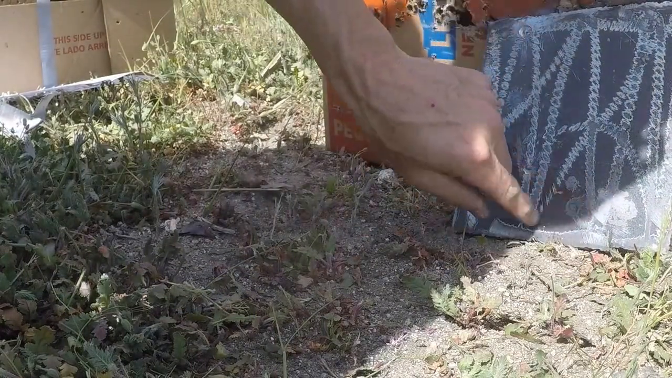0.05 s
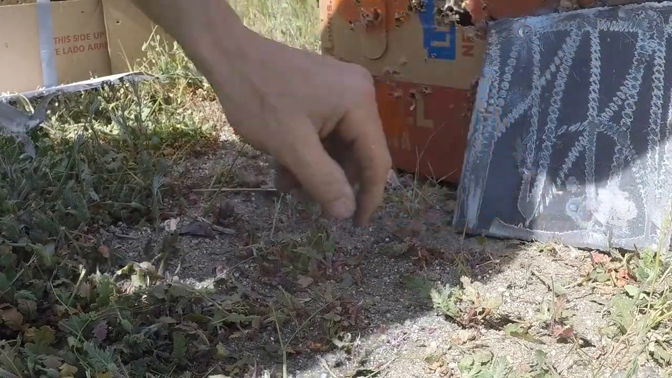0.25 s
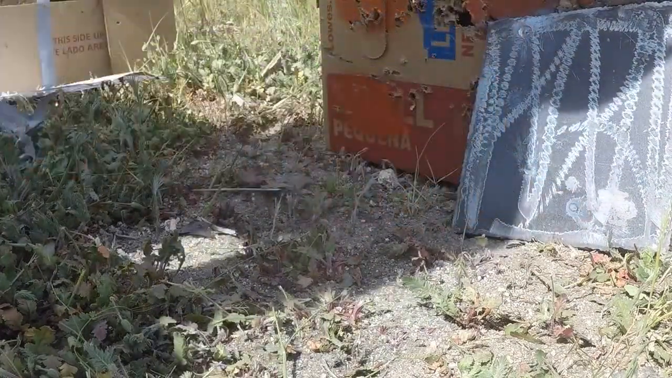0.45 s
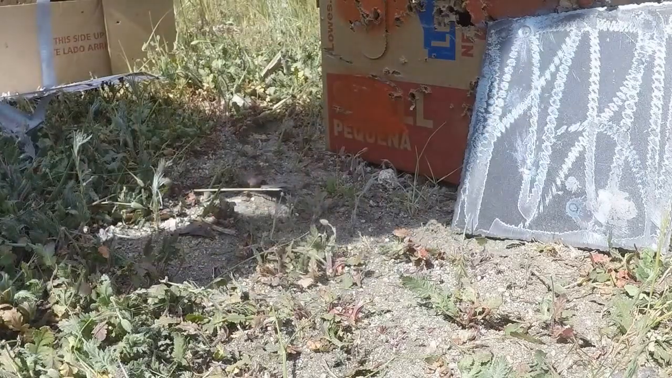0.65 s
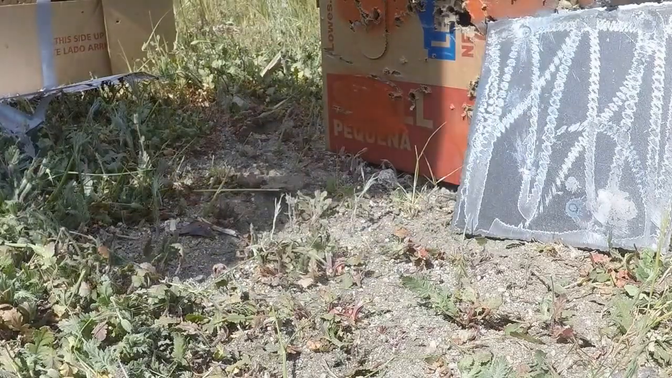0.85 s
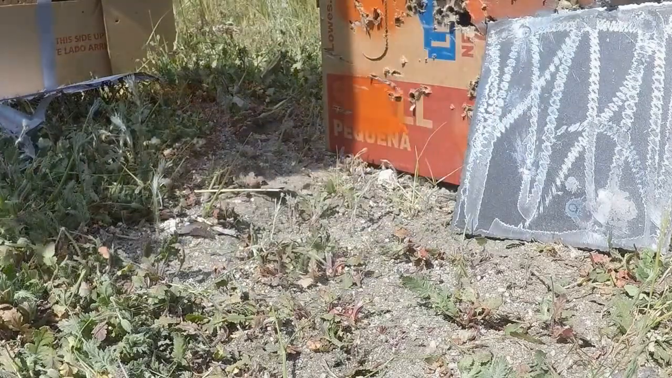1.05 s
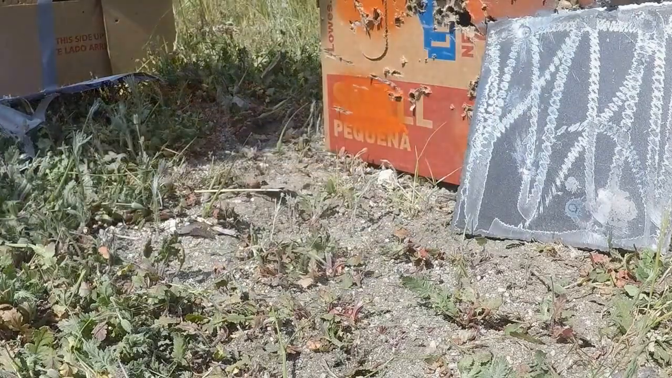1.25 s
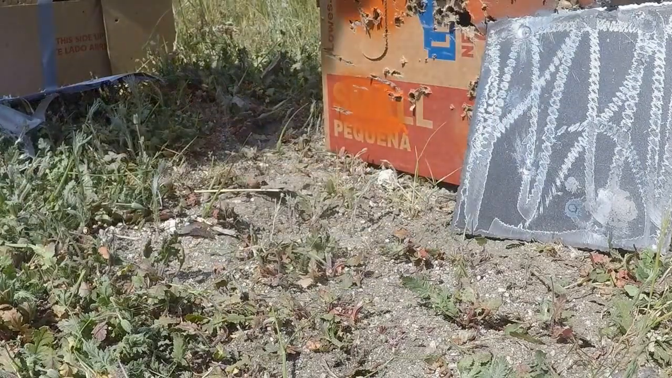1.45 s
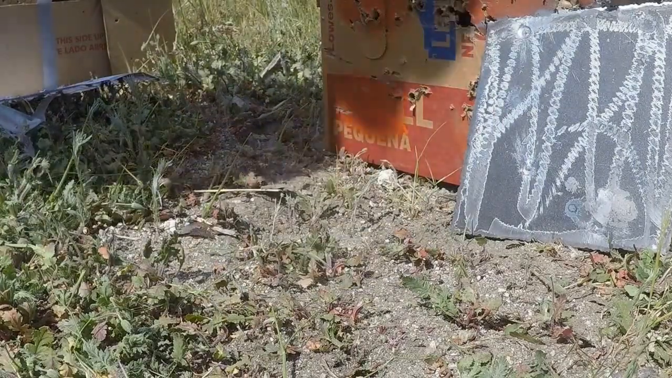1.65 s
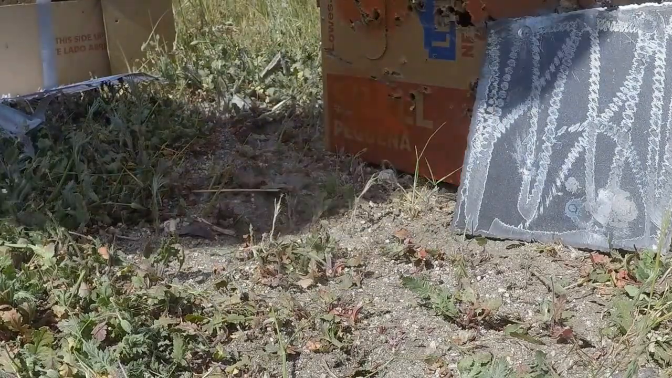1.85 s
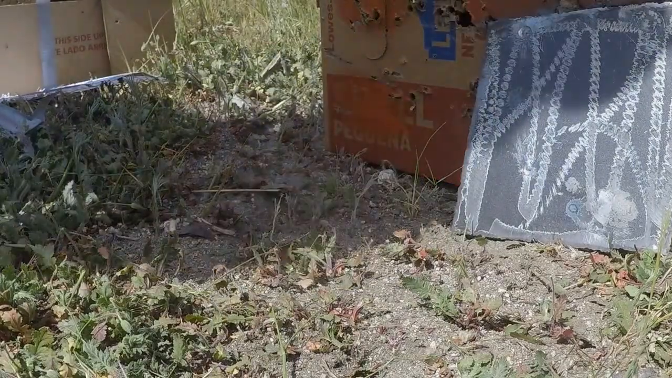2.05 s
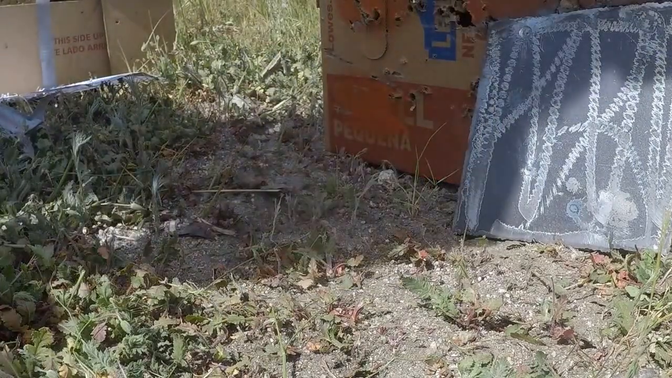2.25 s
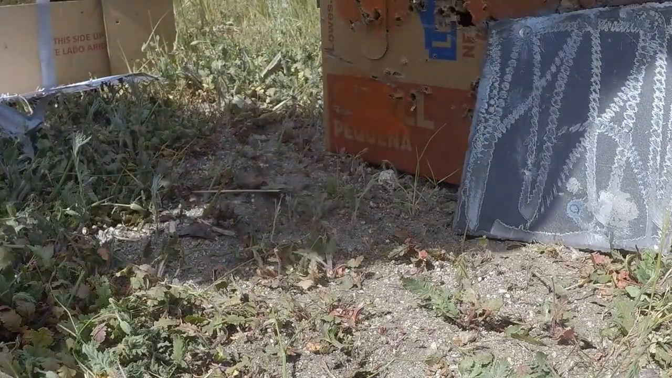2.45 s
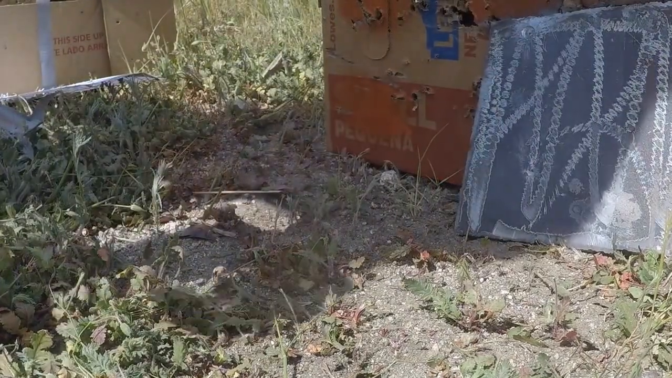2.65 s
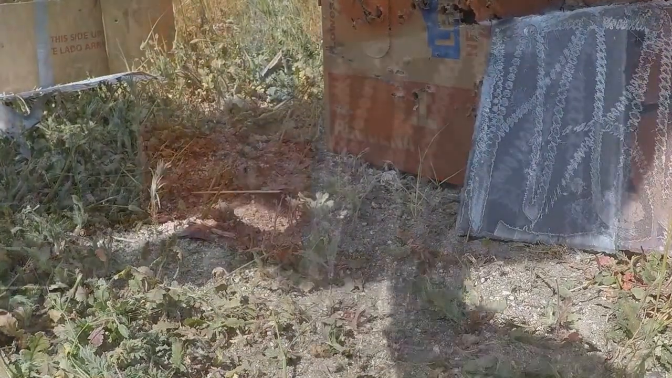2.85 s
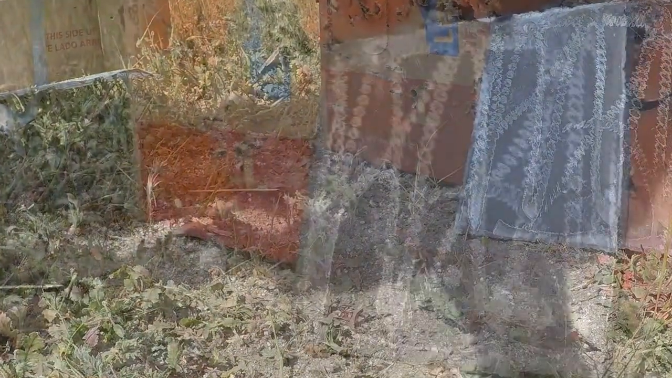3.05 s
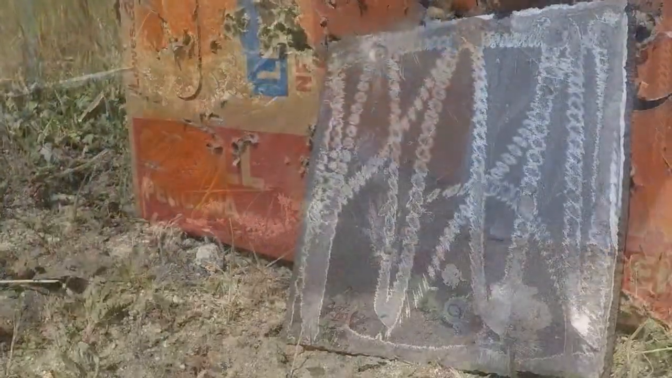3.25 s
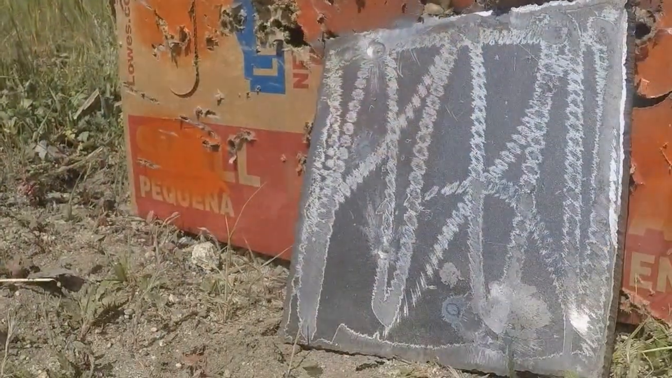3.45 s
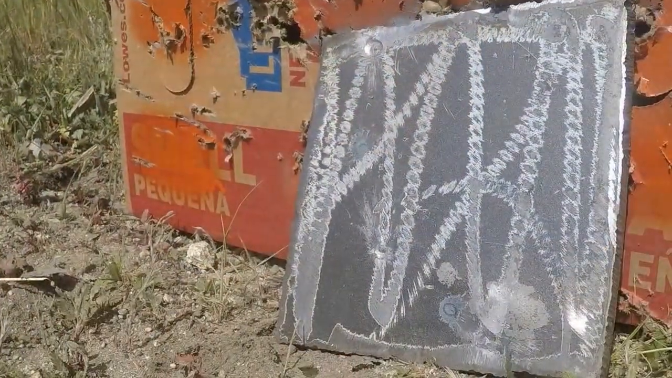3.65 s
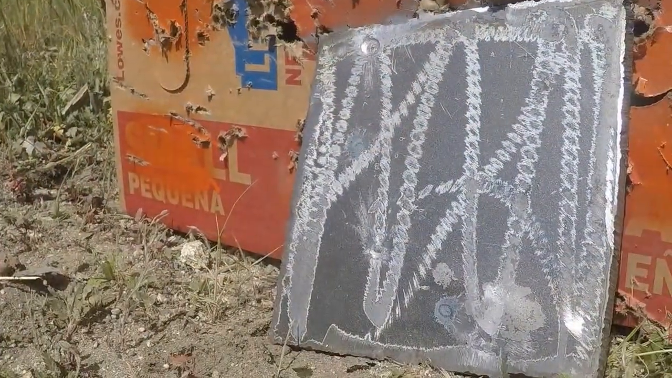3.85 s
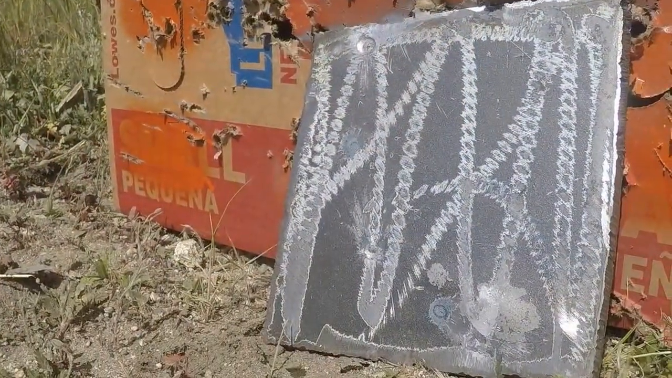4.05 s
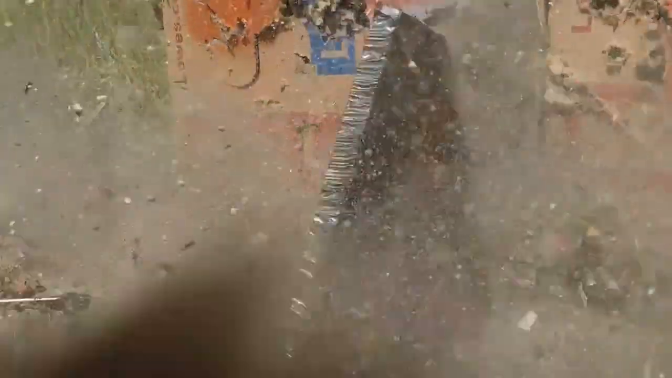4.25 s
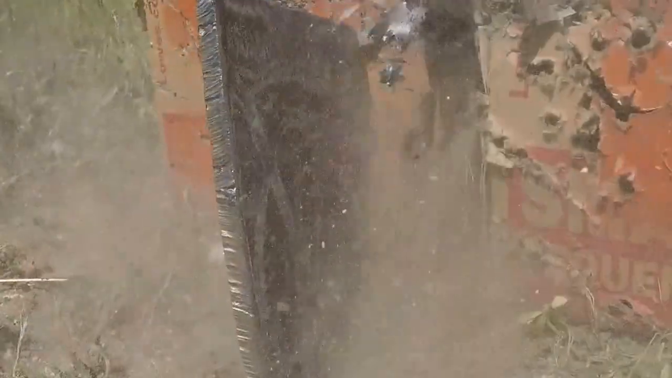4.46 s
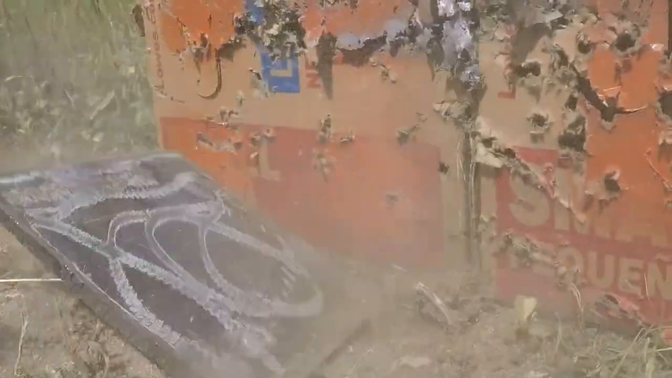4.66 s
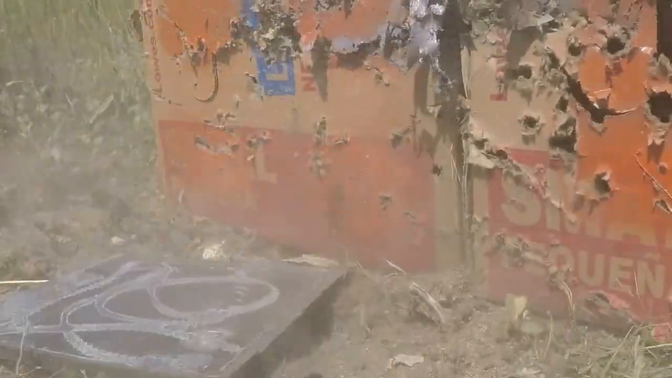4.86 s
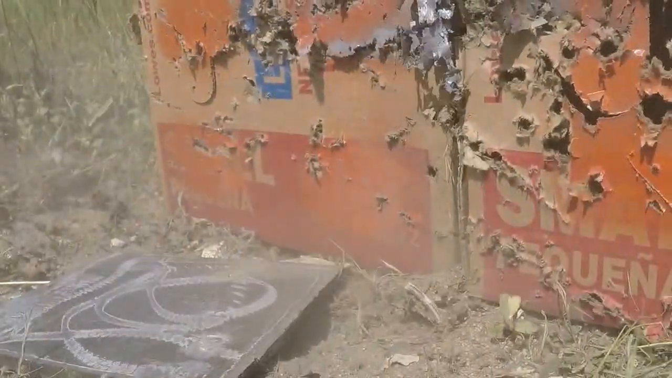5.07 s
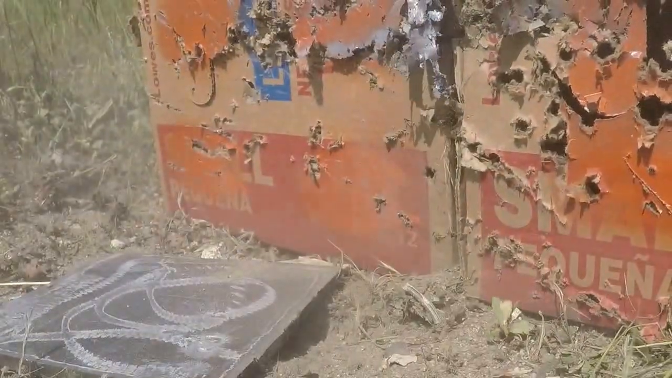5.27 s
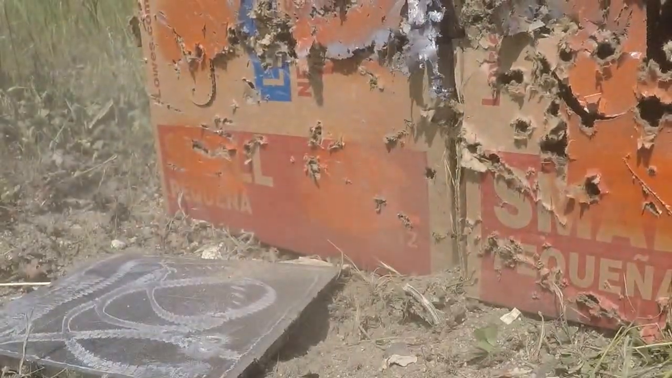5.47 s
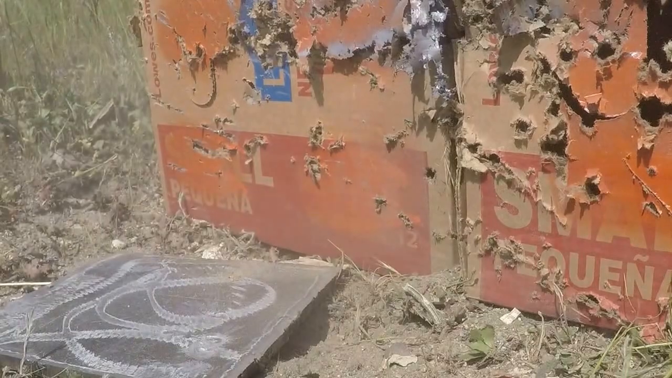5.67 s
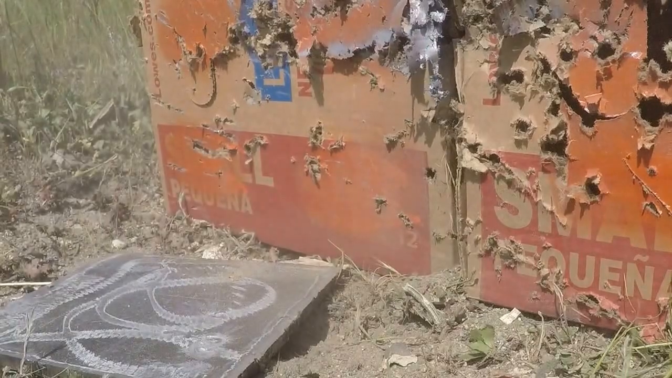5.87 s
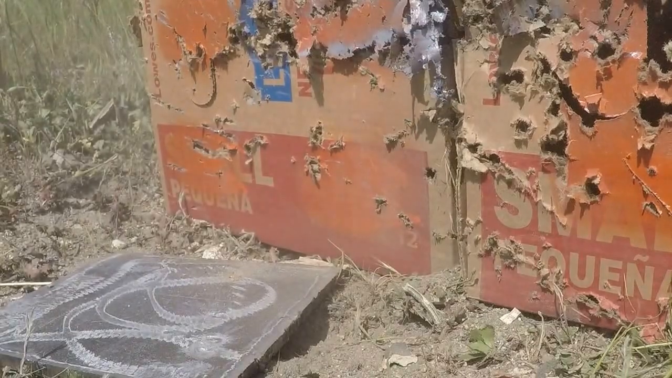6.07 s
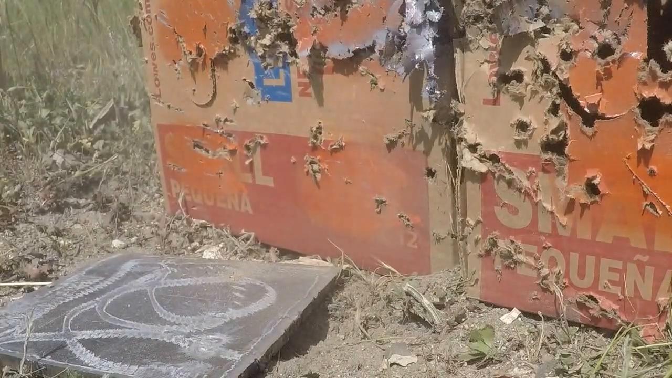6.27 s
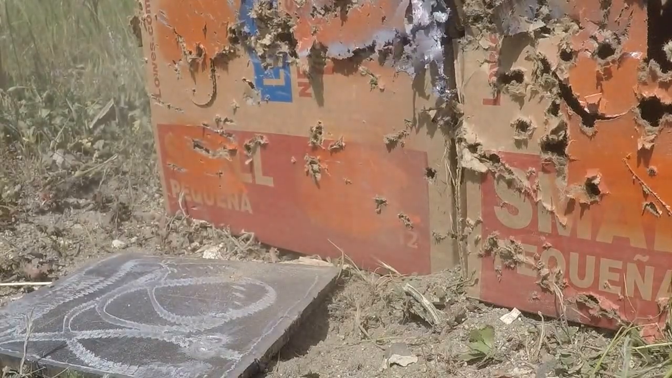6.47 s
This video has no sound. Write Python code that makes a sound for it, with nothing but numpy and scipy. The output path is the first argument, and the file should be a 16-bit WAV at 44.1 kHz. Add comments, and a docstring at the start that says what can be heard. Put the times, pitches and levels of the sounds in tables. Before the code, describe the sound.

Faint steps and soft ticking in open air, a thud and clack, then an overloaded bullet strike on steel, brief ring and pattering debris.

```python
"""A shot slams a steel plate leaning on a cardboard box: decaying modes clank, then ring as it spins and flops down.
Earth, stones and pebbles fly as grain clicks; the blow and its blast of air are damped swings of sagging pitch.
Before it feet shuffle and scuff on dry ground (dense grains), weight thuds, and modes clack over a hollow scrape.
Dry resonant knocks sound further off, in shaped noise for open air and breeze; filtered pulses tick softly.
The camera overloads, turns its gain down, holds it and slowly recovers."""
import sys
import numpy as np
from scipy import signal
from scipy.fft import rfft, irfft
from scipy.io import wavfile
from scipy.ndimage import uniform_filter1d, minimum_filter1d

SR = 44100
rng = np.random.default_rng(int(sys.argv[2]) if len(sys.argv) > 2 else 0)


def master(y):
    """Save y as 16-bit WAV."""
    cut = np.clip(np.atleast_2d(y).T, -1, 1)
    pcm = np.round(cut * 32767)  # scale
    wavfile.write(sys.argv[1], SR, pcm.astype(np.int16))


N = 287443
T = np.arange(N) / SR  # time in the scene, s
AFTER = T[:SR]  # time since a blow, s
STRIKE_S = 4.2288  # the shot meets the plate

# the plate flops down and rocks twice: start_s, level_db (relative to the first contact)
LANDINGS = [(4.801, 0), (4.949, -4.5), (5.085, -13)]


def amp(db):
    """Logarithmic level: decibels to amplitude gain."""
    return 10 ** (np.asarray(db) / 20)


def fade(t60):
    """Exponential decay: the level falls 60 dB in t60 seconds."""
    return amp(-60 * AFTER / max(t60, 1e-3))


def add(out, s, sound):
    """Superposition: mix a sound in at time s."""
    start = int(s * SR)
    out[start:start + len(sound)] += sound[:N - start]


def colour(x, points):
    """Spectral shaping: weight x by a curve of (Hz, dB) points, then scale it to unit spread."""
    hz, db = np.transpose(points)
    f = np.maximum(np.fft.rfftfreq(len(x), 1 / SR), 1)
    gain = amp(np.interp(np.log(f), np.log(hz), db))
    y = irfft(rfft(x) * gain, len(x))
    return y / y.std()


def band_noise(hz, octaves):
    """Band-limited noise: one second under a bell on the octave scale, scaled to unit spread."""
    f = np.geomspace(20, SR / 2, num=64)
    distance = np.log2(f / hz) / octaves
    bell_db = -14 * np.hypot(distance, 1)
    return colour(rng.standard_normal(SR), np.c_[f, bell_db])


def lowpass(x, hz, order=2):
    """Treble loss: a causal Butterworth low-pass."""
    return signal.sosfilt(signal.butter(order, min(hz, .45 * SR), fs=SR, output="sos"), x)


def ring(hz, db, t60):
    """Modal superposition: each mode is a sine with its own exponential decay."""
    return sum(amp(d) * fade(t) * np.sin(2 * np.pi * f * AFTER) for f, d, t in zip(hz, db, t60))


def walk(rate):
    """Random modulation: smoothed random steps, rate per second, scaled to unit spread."""
    k = int(SR / rate)
    steps_held = np.repeat(rng.standard_normal(N // k + 1), k)
    y = uniform_filter1d(steps_held, k)[:N]
    return y / y.std()


def grains(strokes, spectrum, per_s, spread_db, hiss):
    """Granular friction: dense, unequal clicks over the hiss of the finest dust, gated by strokes."""
    power = 0
    for s, rise, hold, fall, db in strokes:
        corners = s + np.cumsum([0, rise, hold, fall])
        power = power + amp(2 * db) * np.interp(T, corners, [0, 1, 1, 0]) ** 3
    sizes = amp(spread_db * np.minimum(rng.exponential(size=N), 5))
    clicks = (rng.random(N) < per_s / SR) * sizes * rng.choice([-1, 1], N)
    texture = clicks / clicks.std() + hiss * rng.standard_normal(N)
    return np.sqrt(power) * colour(texture, spectrum)


def swing(db, first_hz, last_hz, rise_s, t60, sag_s=.008):
    """Damped oscillation: a heavy push on soil or air whose pitch sags as the contact relaxes."""
    hz = last_hz + (first_hz - last_hz) * np.exp(-AFTER / sag_s)
    build_up = 1 - np.exp(-AFTER / rise_s)
    return amp(db) * build_up * fade(t60) * np.sin(2 * np.pi * np.cumsum(hz) / SR)


def click(hz, octaves, edge_ratio=3.2, tap_db=6, tap_cycles=5.0):
    """Inelastic contact: a tap and a crumble; lower, softer clods last longer and have less treble."""
    t60 = .018 * (2500 / hz) ** .6  # the crumble fades in 18 ms at 2500 Hz
    tap = ring([hz], [tap_db], [tap_cycles / hz])
    crumble = fade(t60) * band_noise(hz, octaves)
    return lowpass(tap + crumble, edge_ratio * hz)


def air(air_db=-57, swell_db=.5, wind_db=-55.5, gust_db=3.0):
    """Turbulent noise: outdoor and microphone hiss, and a light breeze rumbling on the microphone."""
    # open air and microphone hiss: pitch_hz, density_db (per Hz)
    hiss_spectrum = [(12, -29), (20, -2.5), (60, -6.5), (216, -17.5), (527, -24.5), (1190, -25),
                     (1760, -30), (3740, -32), (10200, -42.5), (11800, -39.5), (14700, -45.5),
                     (16000, -63.5)]
    wind_spectrum = [(10, -8), (30, 1), (100, -8), (250, -21.5), (1000, -57)]  # Hz, dB per Hz
    hiss = amp(air_db + swell_db * walk(1.5)) * colour(rng.standard_normal(N), hiss_spectrum)
    wind = colour(rng.standard_normal(N), wind_spectrum)
    return hiss + amp(wind_db + gust_db * walk(6)) * wind


def ticks(gain_db=1.5, length_s=.0045, edge_hz=340, bass_hz=38, damping=.75, scatter_db=2.1):
    """Impulse response: a bass cut turns evenly spaced electrical interference pulses into soft bumps."""
    # runs of interference: first_s, last_s, level_db (before gain_db and scatter)
    runs = [(.0392, 3.12, -37), (3.1786, 6.52, -37)]
    period_s = .1024
    out = np.zeros(N)
    for first, last, db in runs:
        for s in np.arange(first, last, period_s):
            level_db = db + gain_db + scatter_db * rng.standard_normal()
            add(out, s, -amp(level_db) * np.exp(-AFTER / length_s))
    w = 2 * np.pi * bass_hz
    b, a = signal.bilinear([1, 0, 0], [1, damping * w, w * w], SR)  # second-order high-pass
    return signal.lfilter(b, a, lowpass(out, edge_hz, order=4))


def knocks(body_db=-12, body_octaves=1.5, tail_t60=.28, tail_octaves=1.2, tail_hz=1150, bass_hz=380):
    """Resonance and scattering: thin cracks excite hollow modes; the surroundings return a noise tail."""
    # dry knocks: start_s, level_db, main_resonance_hz, treble_edge_hz, crack_t60_s, tail_db (re the knock)
    events = [(1.6314, -16, 940, 3300, .028, -29), (1.651, -35, 1050, 1500, .03, -22),
              (5.7498, -23, 980, 1330, .03, -25)]
    # resonances of a knock: multiple_of_main_resonance, level_db, t60_s
    modes = [(.72, -15, .04), (1.0, -1, .007), (1.02, -16, .06), (1.3, -14, .045), (2.0, -12.5, .024),
             (3.4, -15, .018)]
    out = np.zeros(N)
    ratio, mode_db, mode_t60 = np.transpose(modes)
    for s, db, hz, edge_hz, t60, tail_db in events:
        crack = amp(body_db) * fade(t60) * band_noise(hz, body_octaves)
        body = ring(hz * ratio, mode_db, mode_t60)
        tail = amp(tail_db) * fade(tail_t60) * band_noise(tail_hz, tail_octaves)
        add(out, s, amp(db) * lowpass(crack + body + tail, edge_hz, order=5))
    return signal.sosfilt(signal.butter(2, bass_hz, "high", fs=SR, output="sos"), out)


def steps(rise=.36, fall=.42):
    """Envelope similarity: every step swells, holds and dies away in the same shares of its length."""
    # quiet steps through dry grass: start_s, length_s, level_db
    shuffles = [(.0, .8, -66), (.71, .13, -60), (.822, .125, -57), (1.027, .06, -59), (1.135, .155, -55.5),
                (1.7, .75, -68), (2.342, .088, -48.5)]
    hold = max(1 - rise - fall, 0)
    return [(s, rise * length, hold * length, fall * length, db) for s, length, db in shuffles]


def footsteps():
    """Granular friction: soles brush dry grass and grind on gravel."""
    # dry grass: pitch_hz, density_db (per Hz)
    grass_spectrum = [(150, -5), (400, -2), (700, -3), (1200, 2), (1700, -3), (2400, -6), (3000, -11),
                      (4400, -7), (5200, -19), (7000, -20), (9000, -33), (16000, -45)]
    # soles grinding on gravel: start_s, rise_s, hold_s, fall_s, level_db
    scuffs = [(3.171, .003, .036, .06, -26.5), (3.228, .01, .012, .017, -25.5),
              (3.275, .005, .03, .08, -50)]
    # gravel: pitch_hz, density_db (per Hz)
    gravel_spectrum = [(150, -38), (250, -15), (597, -16), (1160, -7), (2280, -7.5), (3170, -3.5),
                       (3710, -7), (5730, -10), (10700, -28), (13200, -24), (15200, -29), (16000, -43)]
    grass = grains(steps(), grass_spectrum, per_s=900, spread_db=2.3, hiss=.65)
    gravel = grains(scuffs, gravel_spectrum, per_s=3500, spread_db=1.8, hiss=.5)
    return grass + gravel


def thuds():
    """Damped oscillation: a heel and shifting weight push the soil, whose pitch sags as it relaxes."""
    # low thuds: start_s, level_db, last_pitch_hz, t60_s
    events = [(3.207, -24, 57, .12), (3.2335, -3, 47, .08), (3.283, -26, 62, .14), (3.364, -23, 170, .1),
              (3.385, -30, 22, .45)]
    sag_ratio = 1.45  # first pitch over last pitch
    out = np.zeros(N)
    for s, db, hz, t60 in events:
        add(out, s, swing(db, sag_ratio * hz, hz, rise_s=.005, t60=t60))
    return out


def drag():
    """Source and filter: the grains of something dragged over the soil ring its hollow body."""
    # strokes over the soil: start_s, rise_s, hold_s, fall_s, level_db (of the grains before filtering)
    strokes = [(3.28, .02, .05, .06, -52), (3.345, .025, .12, .07, -40), (3.52, .03, .05, .07, -48.5)]
    # scraped soil: pitch_hz, density_db (per Hz)
    spectrum = [(100, -8), (200, 1), (400, -4), (800, -2.5), (1400, -10), (2500, -11), (5000, -24),
                (6600, -26), (8000, -42), (16000, -55)]
    # hollow resonances: pitch_hz, width_hz, level_db
    resonances = [(290, 40, 0), (545, 50, 0), (900, 80, -2), (1750, 100, -1), (2500, 130, 3),
                  (3700, 180, -5), (6600, 300, -7)]
    scrape = grains(strokes, spectrum, per_s=550, spread_db=2.6, hiss=.5)
    body = np.zeros(N)
    for hz, width, db in resonances:
        b, a = signal.iirpeak(hz, hz / width, fs=SR)
        body += amp(db) * signal.lfilter(b, a, scrape)
    return .6 * scrape + body


def clack(click_db=-8, click_t60=.018, ceiling=.42, edge_hz=5500, snap_db=-12, snap_t60=.009):
    """Hard contact: a snap, a bright click and a brief modal ring; the loudest swings are flattened."""
    # modes of the struck object: pitch_hz, level_db, t60_s
    modes = [(670, -19, .025), (1050, -19, .02), (1550, -16, .04), (1850, -7, .02), (1906, -26.5, .12),
             (2120, -8, .025), (3390, -21, .02), (3860, -47, .2), (5120, -23, .015)]
    start_s = 3.2693
    out = np.zeros(N)
    bright = amp(click_db) * fade(click_t60) * band_noise(1500, 2.2)
    snap = amp(snap_db) * fade(snap_t60) * band_noise(4500, 1.6)
    sound = lowpass(ring(*np.transpose(modes)) + bright, edge_hz) + snap
    add(out, start_s, ceiling * np.tanh(sound / ceiling))
    return lowpass(out, 2 * edge_hz)


def stones():
    """Inelastic contact: single stones and clods, kicked loose or thrown by the shot, click once."""
    # stones and clods: start_s, level_db, centre_hz, width_octaves
    events = [(.180, -45, 2200, 1.4), (.884, -54, 1200, .9), (1.267, -46, 1700, 1.5),
              (1.7022, -41.5, 1300, 1.0), (2.4205, -40.5, 950, .7), (2.488, -49, 1400, .7),
              (3.1712, -26, 3000, 1.0), (3.3058, -37.5, 4500, .9), (3.365, -30, 750, 1.1),
              (3.555, -37, 1000, 1.0), (4.2416, 1.5, 4600, 1.2), (4.272, -5, 3400, 1.5),
              (4.278, -7, 5000, 1.6), (4.3108, -19.5, 4000, .7), (4.3565, -22, 4700, .6),
              (4.403, -10, 4500, 1.9), (4.460, -39, 600, 1.2), (4.537, -42, 900, .8),
              (4.5725, -25.5, 2200, 1.0), (4.616, -28, 5500, 1.1), (4.651, -23, 2400, .7)]
    out = np.zeros(N)
    for s, db, hz, octaves in events:
        add(out, s, amp(db) * click(hz, octaves))
    return out


def pebbles(centre_hz=5300, size_octaves=.6, scatter_db=3, fall_db=9):
    """Random arrivals: small pebbles patter down at uneven intervals, ever more weakly."""
    # showers: start_s, length_s, pebbles_per_s, first_level_db
    showers = [(3.277, .1, 80, -43), (4.25, .11, 110, -25), (4.67, .5, 22, -45)]
    out = np.zeros(N)
    for s, length, per_s, db in showers:
        progress = 0  # share of the shower gone by
        for strength, size, wait in rng.uniform(-1, 1, size=(24, 3)):
            progress += (1 + wait) / (per_s * length)
            if progress < 1:
                gain = amp(db - fall_db * progress + scatter_db * strength)
                hz = centre_hz * 2 ** (size_octaves * size)
                add(out, s + progress * length, gain * click(hz, octaves=1.0))
    return out


def flying_earth():
    """Granular impacts: earth sprays up from the shot and sifts down."""
    # earth spraying up: start_s, rise_s, hold_s, fall_s, level_db
    sprays = [(4.24, .004, .012, .045, -16.5), (4.275, .005, .04, .13, -36.5)]
    # flying grit: pitch_hz, density_db (per Hz)
    grit_spectrum = [(100, -9), (300, 1), (900, 0), (2800, 2), (6500, -1.5), (10000, -8), (16000, -13)]
    # earth sifting down: start_s, rise_s, hold_s, fall_s, level_db
    sifts = [(4.42, .2, .52, .3, -53)]
    # fine dust: pitch_hz, density_db (per Hz)
    dust_spectrum = [(300, -4), (1200, 3.5), (2500, -2), (4300, -1.5), (5500, -20), (9000, -26),
                     (16000, -34)]
    spray = grains(sprays, grit_spectrum, per_s=900, spread_db=3, hiss=.45)
    dust = grains(sifts, dust_spectrum, per_s=700, spread_db=2.5, hiss=.9)
    return spray + dust


def landing_soil():
    """Damped oscillation: the soil gives under each landing of the plate."""
    out = np.zeros(N)
    for s, db in LANDINGS:
        add(out, s, amp(db) * swing(db=-26, first_hz=170, last_hz=88, rise_s=.003, t60=.18))
    return out


def blow(blast_lag_s=.0077):
    """Impulsive loading: the blow is a damped swing, followed by the lower swing of its blast of air."""
    out = np.zeros(N)
    add(out, STRIKE_S, swing(db=11.5, first_hz=165, last_hz=140, rise_s=.002, t60=.045))
    add(out, STRIKE_S + blast_lag_s, swing(db=13, first_hz=63, last_hz=20, rise_s=.003, t60=.125))
    return out


def plate(crack_db=7, crack_t60=.05):
    """Modal damping and directivity: a clank choked by the box, a free ring that peaks face-on, faint landings."""
    # plate modes: pitch_hz, pressed_db (against the box), pressed_t60_s, flight_db (face-on),
    # landing_db (first contact), free_t60_s
    modes = [(970, -15, .18, -54, -78, .6), (1152, -26, .08, -59.5, -68, 1.2),
             (1433, -19, .15, -18.5, -75, 1.3), (1747, -3, .13, -52, -59, 1.0),
             (2222, -12.5, .11, -56.5, -78, .6), (2418, -18.5, .12, -45, -53, .9),
             (2500, -9, .17, -50.5, -77, .4), (2543, -12, .2, -37, -53, 1.05),
             (4090, -.5, .07, -46, -76, .4), (4328, 5.5, .08, -45.5, -57, 1.0),
             (4362, -4, .1, -30.5, -65, .7), (4425, -4, .07, -56.5, -57, 1.1),
             (4825, -5, .09, -33, -75, .45), (5437, -14.5, .05, -57, -62, .8),
             (6425, -11.5, .08, -52.5, -80, .3), (7090, -17, .05, -58.5, -75, .8),
             (8075, -19.5, .06, -42, -83, .5), (8510, -12, .08, -53.5, -82, .7)]
    # crack of the strike: pitch_hz, density_db (per Hz)
    crack_spectrum = [(60, -1), (140, 8), (240, 17), (400, 13), (600, 5.5), (1100, -2.5), (2800, -1.5),
                      (3400, 1.5), (4200, 5), (5200, -1), (6500, -2), (10000, -16), (16000, -25)]
    # the spinning plate faces the microphone: moment, half-width of the pass, level once edge-on
    face_s, face_width_s, edge_on_db = 4.385, .093, -43
    hz, pressed_db, pressed_t60, flight_db, landing_db, free_t60 = np.transpose(modes)
    out, flight = np.zeros(N), np.zeros(N)
    crack = amp(crack_db) * fade(crack_t60) * colour(rng.standard_normal(SR), crack_spectrum)
    add(out, STRIKE_S, crack)
    add(out, STRIKE_S, ring(hz, pressed_db, pressed_t60))
    add(flight, STRIKE_S, ring(hz, flight_db, free_t60))
    for s, db in LANDINGS:
        add(out, s, ring(hz, landing_db + db, free_t60))
    facing = np.exp(-((T - face_s) / face_width_s) ** 2)
    return out + flight * (facing + amp(edge_on_db))


def scene():
    """Superposition: every source adds at one microphone."""
    background = air() + ticks() + knocks()
    handling = footsteps() + thuds() + drag() + clack()
    debris = stones() + pebbles() + flying_earth()
    shot = landing_soil() + blow() + plate()
    return (background + handling + debris + shot)[None]


def gain_control(x, threshold_db=-3, depth_db=14.0, attack_s=.018, hold_s=.7, recover_db_per_s=16):
    """Dynamic compression: an overload pulls the gain down fast; it is held, then creeps back."""
    over = np.clip(20 * np.log10(np.abs(x) + 1e-9) - threshold_db, 0, depth_db)
    half = int(hold_s * SR / 2)
    held = -minimum_filter1d(-over, 2 * half + 1, origin=half)  # largest excess in the past hold_s
    recovery = recover_db_per_s * T
    cut = np.maximum.accumulate(held + recovery) - recovery
    return x * amp(-lowpass(cut, 1 / (2 * np.pi * attack_s), order=1))


def record(dry):
    """Nonlinear and band-limited transmission: the camera rides its gain, clips and cuts the top."""
    top_hz = 15400
    clipped = np.clip(gain_control(dry[0]), -.95, .95)
    return signal.sosfilt(signal.ellip(8, .2, 70, top_hz, fs=SR, output="sos"), clipped)[None]


dry = scene()
out = record(dry)
master(out)
```